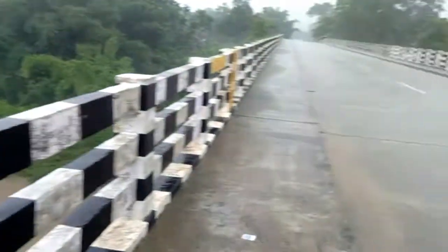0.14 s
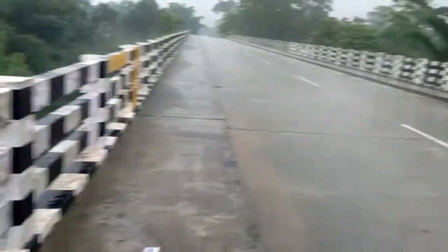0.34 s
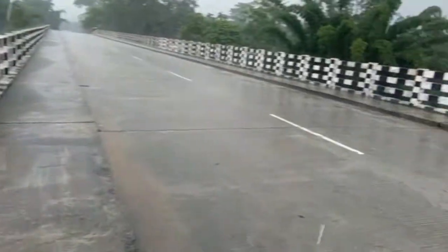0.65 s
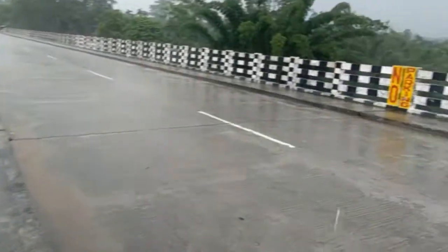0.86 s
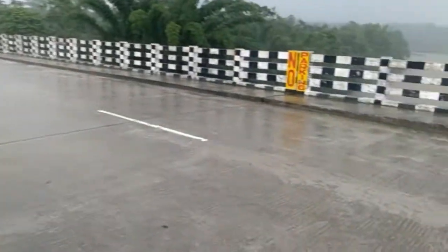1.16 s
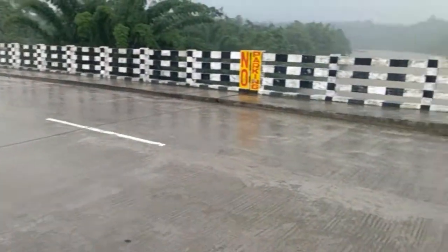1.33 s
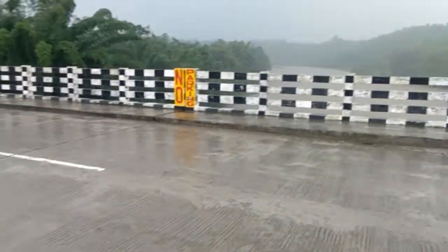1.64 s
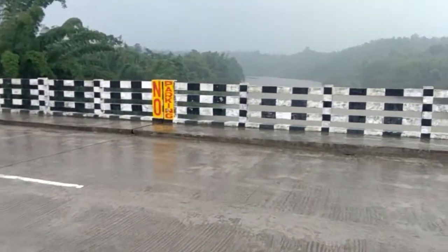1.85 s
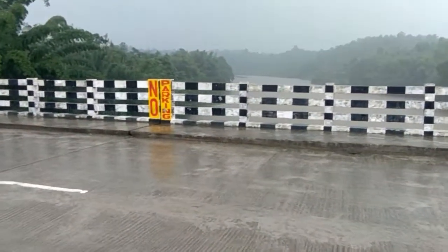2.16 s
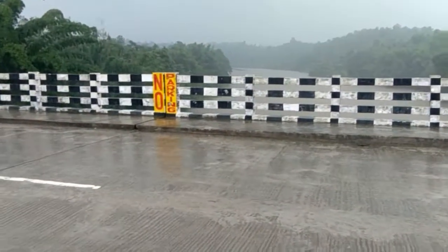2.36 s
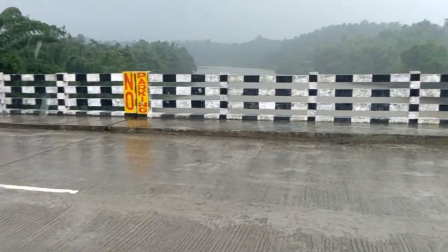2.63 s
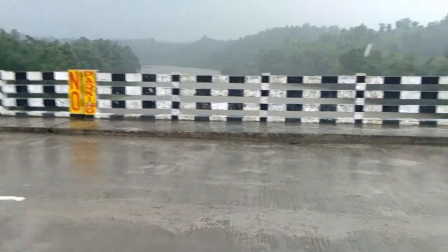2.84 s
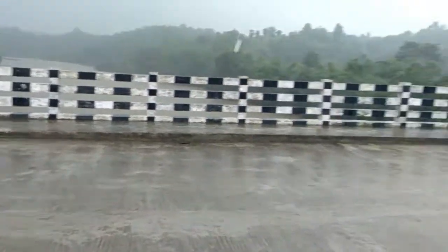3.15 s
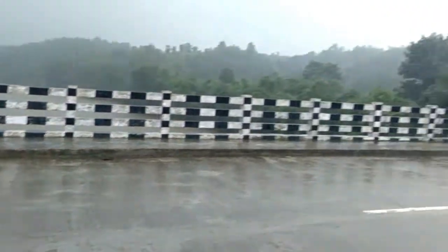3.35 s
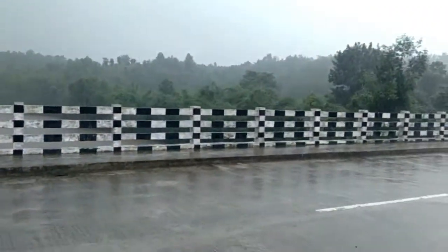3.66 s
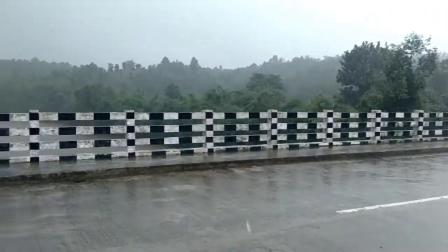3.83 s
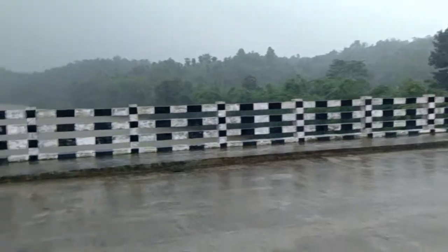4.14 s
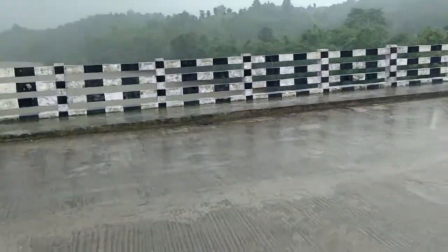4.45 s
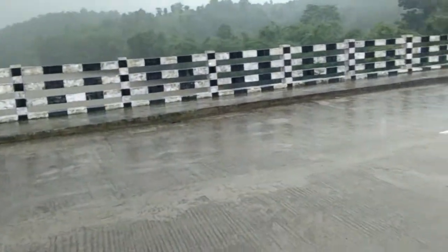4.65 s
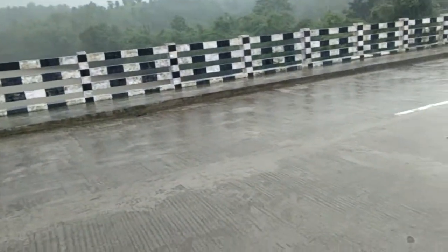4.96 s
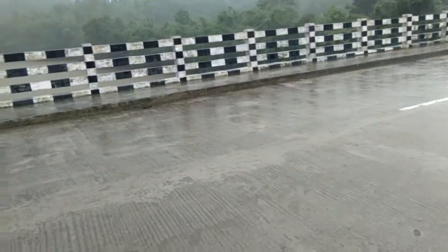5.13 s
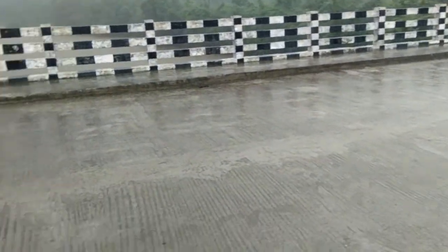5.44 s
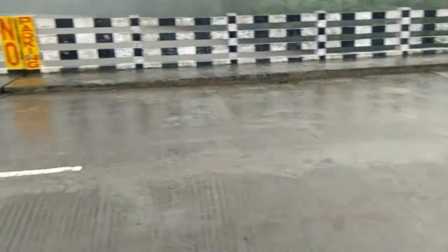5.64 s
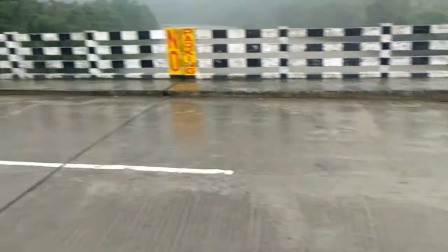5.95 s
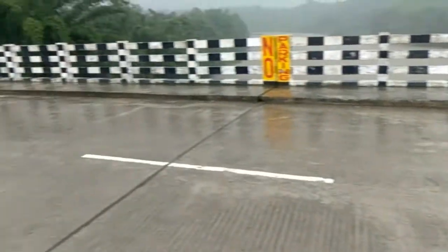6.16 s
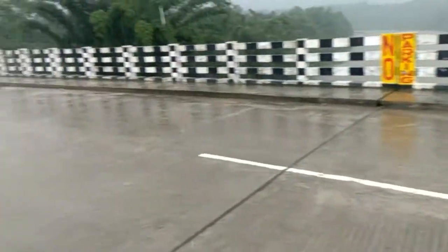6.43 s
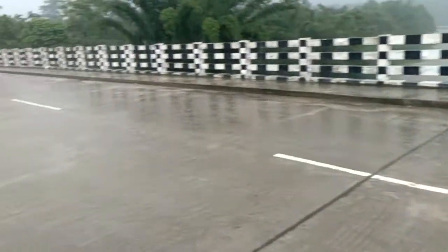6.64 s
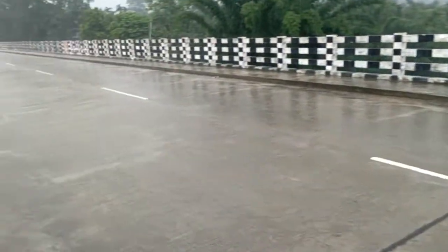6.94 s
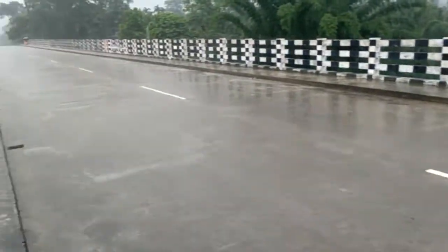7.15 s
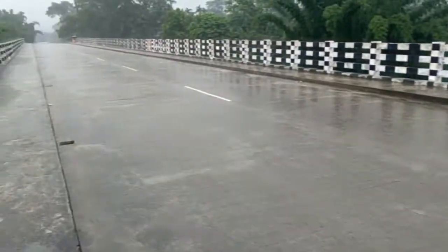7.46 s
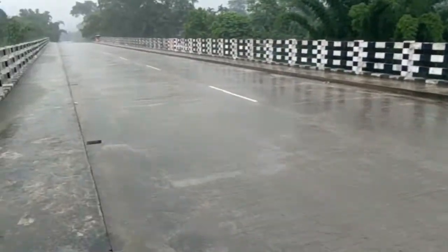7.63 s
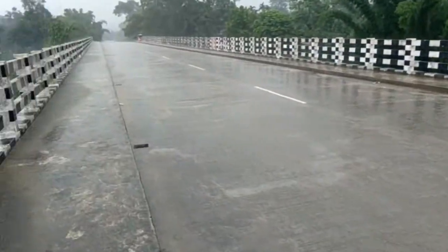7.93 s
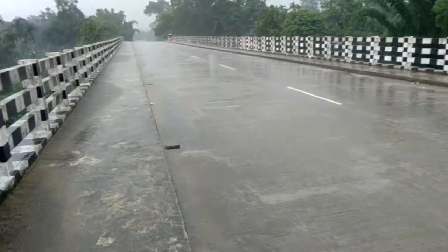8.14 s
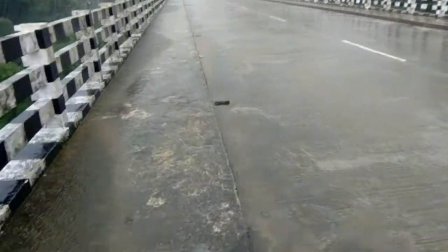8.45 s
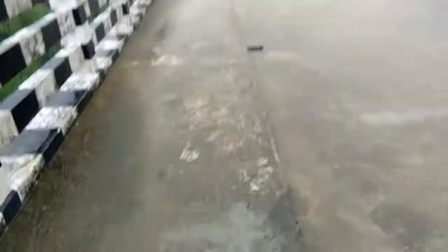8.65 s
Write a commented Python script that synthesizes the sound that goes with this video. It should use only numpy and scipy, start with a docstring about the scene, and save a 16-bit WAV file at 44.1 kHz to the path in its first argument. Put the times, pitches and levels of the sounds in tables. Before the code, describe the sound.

Heavy rain patters close by and hisses on a wet road while gusts of wind buffet the microphone.

```python
"""Heavy rain on a concrete road bridge: close drops patter dully, as on an umbrella.
Far drops merge into a wash from the wet road and a hiss from the trees, which fades as the
hand-held microphone turns away. Fine spray ticks, shoes scuff, something brushes like a sleeve.
Gusts buffet the microphone; the strongest push its limiter down."""
import sys
import numpy as np
from scipy import signal
from scipy.fft import rfft, irfft, next_fast_len
from scipy.io import wavfile
from scipy.ndimage import uniform_filter1d, minimum_filter1d

SR = 44100
rng = np.random.default_rng(int(sys.argv[2]) if len(sys.argv) > 2 else 0)


def int16_out(signal):
    """Quantize to a 16-bit WAV file."""
    q = np.round(np.clip(np.atleast_2d(signal).T, -1, 1) * 32767)
    wavfile.write(sys.argv[1], SR, q.astype(np.int16))


N = 387638
TIME_S = np.arange(N) / SR

# Level curves. Each row: time in seconds, relative level in dB.
RAIN_CURVE = [(0, -25.5), (1.2, -25), (1.9, -22.5), (2.2, -24), (2.95, -24), (3.8, -25.5), (4.35, -24.5),
              (4.6, -28), (5.25, -27), (5.55, -26.5), (6.07, -24.5), (6.9, -27), (7.25, -25.5),
              (7.58, -27.5), (8, -27), (8.79, -27)]  # how hard it rains
TREE_CURVE = [(0, -29), (2, -32), (3.2, -36), (4.2, -40), (6, -45.5), (8.79, -66)]  # rain in the treetops
AIR_CURVE = [(0, -42), (1.15, -38.5), (1.8, -26), (3.75, -28.5), (4.4, -31.5), (5.35, -41.5), (5.75, -38),
             (6.1, -31.5), (6.85, -35), (7.2, -45), (7.7, -37.5), (8.15, -33), (8.5, -40.5)]  # light air on the microphone

# Spectra. Each row: frequency in Hz, relative spectral density in dB.
ROAD_SPECTRUM = [(60, 3), (200, -7), (500, -2.5), (1000, -3.5), (1750, 0), (2400, -5), (4000, -16),
                 (5500, -25.5), (7200, -35.5), (10000, -41.5), (15500, -59)]
LEAF_SPECTRUM = [(100, 2.5), (230, 3.5), (500, 0), (1750, -1.5), (2300, -4.5), (4100, -5.5), (5000, -12),
                 (5700, -14.5), (6100, -20), (8000, -29), (9200, -31.5), (12000, -36), (15500, -39)]
FIZZ_SPECTRUM = [(5900, -35), (6600, 3), (8000, 3), (9300, -10), (12000, -13), (15500, -25)]  # top of the leaf hiss
SPRAY_SPECTRUM = [(500, -20), (3000, 2), (7000, 3), (10000, -2), (15000, 0)]
DROP_SPECTRUM = [(60, -24.5), (160, -3.5), (350, 2), (600, -4), (950, -0.5), (1300, -3), (1800, -4.5),
                 (2300, -12.5), (3000, -12), (4100, -19), (6000, -30.5), (7200, -38.5), (10000, -47.5),
                 (15500, -52.5)]

# Shoe scuffs. Each row: centre in seconds, width in seconds, level in dB.
SHOE_SCUFFS = [(3.549, .081, -36), (4.208, .06, -35.5), (4.804, 0.076, -35.5), (7.22, 0.13, -45),
               (7.79, .06, -38), (8.4, .028, -40)]
# Louder spray ticks. Each row: start in seconds, peak in dB.
SPRAY_TICKS = [(1.8033, -32), (2.7205, -32), (7.3228, -37), (8.3097, -33)]
# Gusts. Each row: centre in seconds, width in seconds, level in dB.
WIND_GUSTS = [(1.078, 0.028, -22), (1.364, 0.082, -12.5), (1.611, 0.056, -7.5), (1.71, 0.16, -15),
              (2.03, 0.26, -21.5), (2.251, 0.12, -17.5), (2.418, 0.17, -17), (2.538, .06, -13.5),
              (2.788, 0.1, -18.5), (2.97, 0.18, -20), (3.15, 0.083, -21), (3.29, 0.065, -18.5),
              (3.554, 0.042, -16), (3.713, 0.019, -16), (3.961, 0.064, -11.5), (4.141, 0.084, -9.5),
              (4.216, .07, -17), (4.767, .28, -20), (5.976, 0.25, -21), (6.079, 0.073, -18.5),
              (6.223, 0.032, -17.5), (6.53, 0.07, -24), (7.056, 0.023, -21), (7.349, 0.16, -22.5),
              (7.751, 0.026, -19.5)]
# Hard buffets. Each row: centre in seconds, relative peak in dB, half-width in seconds.
WIND_BUFFETS = [(1.2875, -4, 0.00049), (1.3455, -1.5, .00061), (1.3639, -3.5, 0.0004),
                (1.5642, -2, 0.00053), (1.601, -1, 0.00076), (1.635, -1, 0.00054), (2.1723, 0, 0.00076),
                (2.271, 0, 0.00047), (2.555, -3, 0.00034), (5.9097, -4, .00072), (6.231, -10, 0.0016),
                (6.920, -10, 0.00067), (8.16, -6.5, 0.00062)]
# Fat drops close by. Each row: time in seconds, peak in dB, ring pitch in Hz.
FAT_DROP_HITS = [(2.855, -10, 985), (2.91, -9.5, 872), (3.135, -12, 896), (3.54, -11.5, 985),
                 (3.722, -8.5, 1070), (4.021, -11, 977), (5.566, -10, 821), (5.588, -11, 1860),
                 (7.106, -13.5, 1190), (8.006, -12.5, 651), (8.035, -15.5, 999), (8.637, -16.5, 721)]


def gain_of(db):
    """Decibels to amplitude."""
    return 10 ** (np.asarray(db) / 20)


def unit_rms(x):
    """Scale to rms 1."""
    return x / np.sqrt(np.mean(x ** 2) + 1e-20)


def spectrum_db(spectrum, hz):
    """Interpolate a spectrum on a log frequency axis."""
    knots_hz, knots_db = np.transpose(spectrum)
    return np.interp(np.log(hz + 1), np.log(knots_hz + 1), knots_db)


def curve_db(curve):
    """A level curve at every sample."""
    return np.interp(TIME_S, *np.transpose(curve))


def add(mix, start_s, sound):
    """Mix a sound in at start_s."""
    part = mix[max(round(start_s * SR), 0):][:len(sound)]
    part += sound[:len(part)]


def coloured(x, spectrum):
    """Filter by a spectrum; rms 1."""
    size = next_fast_len(len(x))
    response = gain_of(spectrum_db(spectrum, np.fft.rfftfreq(size, 1 / SR)))
    return unit_rms(irfft(rfft(x, size) * response, size)[:len(x)])


def noise(spectrum, size=N):
    """Coloured noise, rms 1."""
    return coloured(rng.standard_normal(size), spectrum)


def wander(per_s, size=N):
    """Random curve with per_s knots a second, rms 1."""
    knots = rng.standard_normal(4096)
    return unit_rms(np.interp(np.arange(size) / SR * per_s, np.arange(len(knots)), knots))


def minimum_phase_pulse(db):
    """The sharpest causal pulse with this spectrum."""
    log_gain = np.log(gain_of(np.r_[db, db[-2:0:-1]]))
    return irfft(np.exp(np.conj(signal.hilbert(log_gain)))[:len(db)])


def wash(rain_db, road_db=-7.5, flicker_db=0.7, rustle_db=0.83, fizz_db=-26.5, fizz_flicker_db=2.0):
    """Countless far drops merge: a wash from the road, a brighter hiss from the leaves."""
    road = noise(ROAD_SPECTRUM) * gain_of(rain_db + road_db + flicker_db * wander(120))
    hiss = noise(LEAF_SPECTRUM) * gain_of(rustle_db * wander(150))
    fizz = noise(FIZZ_SPECTRUM) * gain_of(fizz_db + fizz_flicker_db * wander(200))
    return road + (hiss + fizz) * gain_of(curve_db(TREE_CURVE))


def spray(per_s=45, faint_db=-60.5, spread_db=3.2, decay_s=0.0007, size=512):
    """Droplets land on the microphone's housing as tiny bright ticks."""
    faint = [(when * N / SR, faint_db + spread_db * min(-np.log(1 - weight), 4))
             for when, weight in rng.random((int(per_s * N / SR), 2))]
    fade = np.exp(-np.arange(size) / SR / decay_s)
    out = np.zeros(N)
    for start_s, peak_db in list(SPRAY_TICKS) + faint:
        tick = noise(SPRAY_SPECTRUM, size) * fade
        add(out, start_s, gain_of(peak_db) * tick / abs(tick).max())
    return out


def swish(level_db=-43, peak_s=7.624, rise_s=0.02, fall_s=0.003):
    """A brief bright brush, as of a sleeve, swells and stops."""
    cloth_spectrum = [(800, -6), (4500, 0), (9000, -8), (15000, -13)]
    out, t = np.zeros(N), np.arange(-SR // 8, SR // 32) / SR
    envelope = np.exp(-np.maximum(-t / rise_s, t / fall_s))
    add(out, peak_s + t[0], gain_of(level_db) * envelope * noise(cloth_spectrum, len(t)))
    return out


def scuffs(peak_hz=3200, grit_db=2.5, size=11000):
    """A sole drags grit and water over the concrete."""
    sole_spectrum = [(100, -25), (peak_hz / 2, -7), (peak_hz, 0), (peak_hz * 1.25, -3),
                     (peak_hz * 2, -23), (peak_hz * 3, -41), (SR, -52)]
    out, t = np.zeros(N), (np.arange(size) - (size - 1) / 2) / SR
    for centre_s, width_s, db in SHOE_SCUFFS:
        envelope = np.cos(np.clip(t / width_s, -1, 1) * np.pi / 2) ** 2
        grit = rng.standard_normal(size) * gain_of(grit_db * wander(501, size))
        add(out, centre_s + t[0], gain_of(db) * envelope * coloured(grit, sole_spectrum))
    return out


def eddies(size, edge_hz, low_hz=76, knee_hz=170, steepness=4.6, flutter_db=5.5, steadying=0.98):
    """Turbulence at the microphone port: a low flutter that falls away above edge_hz."""
    hz = np.geomspace(10, 20000, num=40)
    power_loss = (1 + (low_hz / hz) ** 6) * (1 + hz / knee_hz) * (1 + (hz / edge_hz) ** steepness)
    flow = noise(np.c_[hz, -10 * np.log10(power_loss)], size)
    # Level out slow swells, then impose a fast flutter.
    local_rms = np.sqrt(abs(uniform_filter1d(flow ** 2, size=1200)) + 1e-9)
    flutter = gain_of(flutter_db * np.tanh(wander(110, size)))
    return unit_rms(flow / local_rms ** steadying * flutter)


def light_air(edge_hz=140, puff_db=3.5, puffs_per_s=18):
    """Air crosses the microphone throughout, in small puffs."""
    return eddies(N, edge_hz) * gain_of(curve_db(AIR_CURVE) + puff_db * wander(puffs_per_s))


def gusts(ref_hz=205, ref_db=-19, ref_s=0.092, db_per_octave=11):
    """Abrupt gusts, brighter when strong, or long enough to break into fine eddies."""
    out, t = np.zeros(N), np.arange(-SR // 4, SR // 4) / SR
    for centre_s, width_s, db in WIND_GUSTS:
        envelope = np.exp(-abs(2 * t / width_s) ** 3)
        edge_hz = ref_hz * 2 ** ((db - ref_db) / db_per_octave) * (width_s / ref_s) ** 0.25
        add(out, centre_s + t[0], gain_of(db) * envelope * eddies(len(t), edge_hz))
    return out


def buffets(boost_db=1, leak_hz=75, size=2048):
    """One large eddy is a pressure spike; the port leaks, so a slower suck back follows."""
    out, t = np.zeros(N), (np.arange(size) - size // 4) / SR
    leak = signal.butter(2, leak_hz, "highpass", fs=SR)
    for centre_s, db, half_width_s in WIND_BUFFETS:
        push = signal.lfilter(*leak, 1 / (1 + (t / half_width_s) ** 2))
        add(out, centre_s + t[0], gain_of(db + boost_db) * push / abs(push).max())
    return out


def drop(pitch_hz, ring_db=10, ring_octaves=0.33, tilt_db_per_octave=2,
         splash_energy=0.14, splash_s=0.0017, size=2048):
    """One drop: a dull, damped snap with its own ring and brightness, then a few ms of splash."""
    hz, t = np.fft.rfftfreq(size, 1 / SR), np.arange(size) / SR
    resonance_db = ring_db * np.exp(-(np.log2((hz + 1) / pitch_hz) / ring_octaves) ** 2)
    tilt_db = tilt_db_per_octave * np.clip(rng.standard_normal(), -2, 2) * np.log2(1 + hz / pitch_hz)
    snap = minimum_phase_pulse(spectrum_db(DROP_SPECTRUM, hz) + resonance_db + tilt_db)
    splash = rng.standard_normal(size) * np.exp(-t / splash_s)
    splash *= np.sqrt(splash_energy) / np.linalg.norm(splash)
    splash[0] += 1  # direct hit
    return signal.fftconvolve(snap, splash)[:size]


def fat_drops(lag_s=0.001, lowpass_hz=4200):
    """The heaviest drops stand out of the patter; being large, they land more softly."""
    out = np.zeros(N)
    softening = signal.butter(2, lowpass_hz, fs=SR)
    for time_s, peak_db, pitch_hz in FAT_DROP_HITS:
        hit = drop(pitch_hz, ring_db=8, ring_octaves=0.35, tilt_db_per_octave=0.6,
                   splash_energy=0.35, splash_s=0.002)
        hit = signal.lfilter(*softening, hit)
        add(out, time_s + lag_s, gain_of(peak_db) * hit / abs(hit).max())
    return out


def patter(rain_db, per_s=570, spread_db=4.0, low_hz=480, high_hz=2400, clump_db=0.67, offset_db=-2.0):
    """Hundreds of close drops a second, many small and a few large, in loose clumps."""
    drops = [unit_rms(drop(hz)) for hz in np.geomspace(low_hz, high_hz, num=160)]
    clumps = gain_of(clump_db * np.tanh(wander(90)))
    out = np.zeros(N)
    for when, pick, weight in rng.random((int(per_s * N / SR), 3)):
        size_db = spread_db * min(-np.log(1 - weight), 2.3)  # capped exponential
        add(out, when * N / SR, gain_of(size_db) * drops[int(pick * len(drops))])
    return unit_rms(out * clumps) * gain_of(rain_db + offset_db)


def scene(surge_db=0.33, surges_per_s=7):
    """Slightly surging rain, small movements and wind, in mono."""
    rain_db = curve_db(RAIN_CURVE) + surge_db * wander(surges_per_s)
    rain = patter(rain_db) + fat_drops() + wash(rain_db) + spray()
    movement = scuffs() + swish()
    wind = light_air() + gusts() + buffets()
    return (rain + movement + wind)[None]


def record(dry, low_cut_hz=56, ceiling_db=-3.5, recovery_db_per_s=90, high_cut_hz=15550):
    """Microphone bass cut, a limiter that ducks everything on the hardest gusts, band limit."""
    size = 2 * next_fast_len(N)
    hz = np.fft.rfftfreq(size, 1 / SR)
    heard = irfft(rfft(dry, size) / np.sqrt(1 + (low_cut_hz / (hz + 1)) ** 6))[:, :N]
    over_db = np.maximum(20 * np.log10(abs(heard[0]) + 1e-9) - ceiling_db, 0)
    recovery_db = TIME_S * recovery_db_per_s
    held_db = np.maximum.accumulate(over_db + recovery_db) - recovery_db
    duck_db = uniform_filter1d(minimum_filter1d(-held_db, size=90), size=90)  # 2 ms look-ahead
    lowpass = signal.firwin(1023, high_cut_hz, window=("kaiser", 9), fs=SR)
    return signal.oaconvolve(heard * gain_of(duck_db), lowpass[None], "same")


dry = scene()
out = record(dry)
int16_out(out)
```